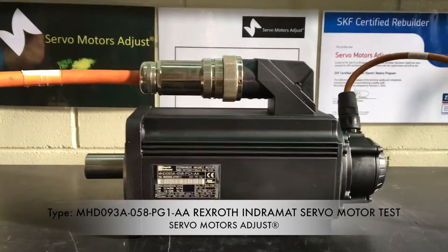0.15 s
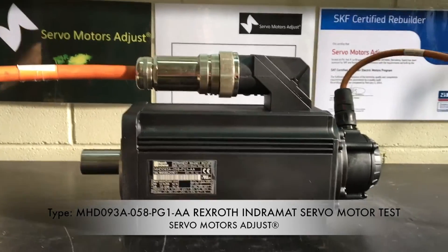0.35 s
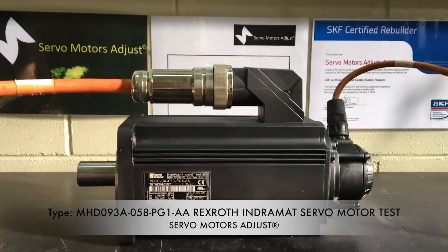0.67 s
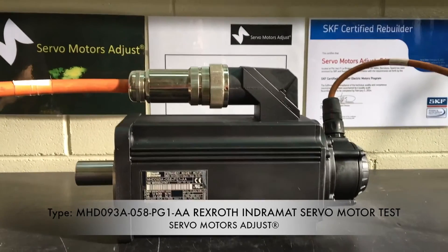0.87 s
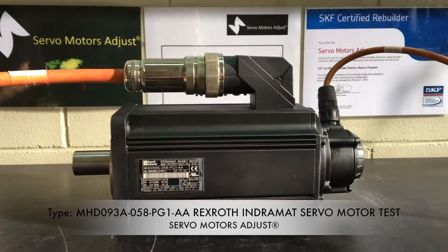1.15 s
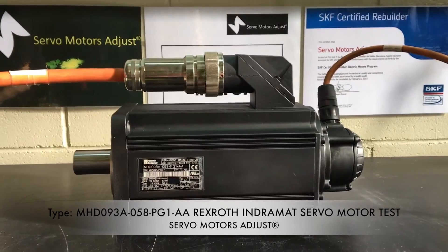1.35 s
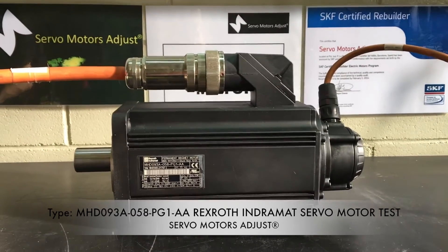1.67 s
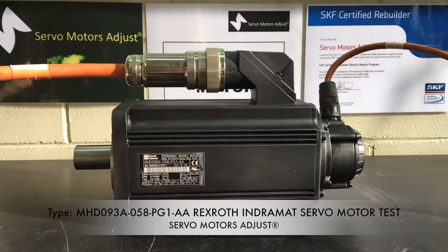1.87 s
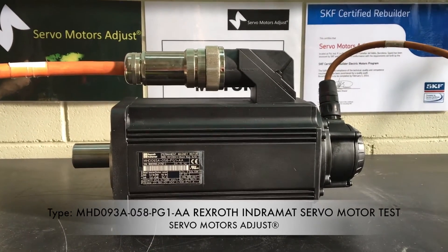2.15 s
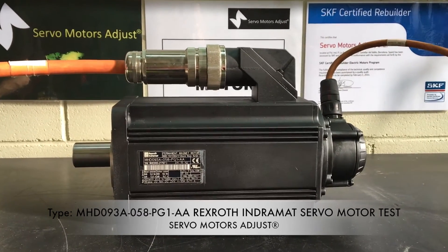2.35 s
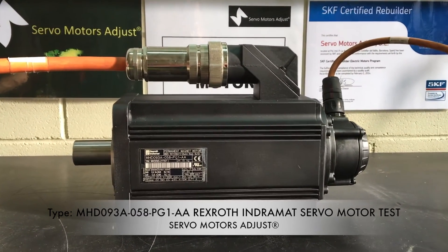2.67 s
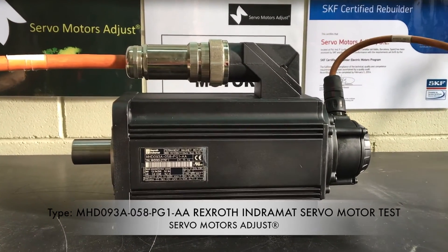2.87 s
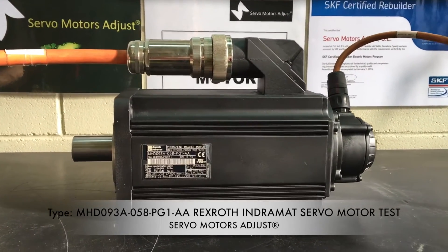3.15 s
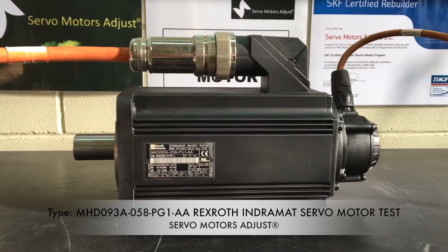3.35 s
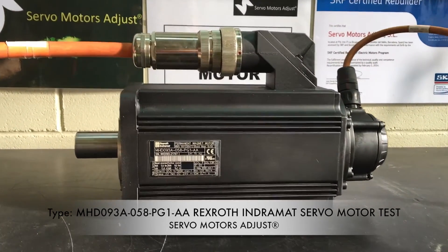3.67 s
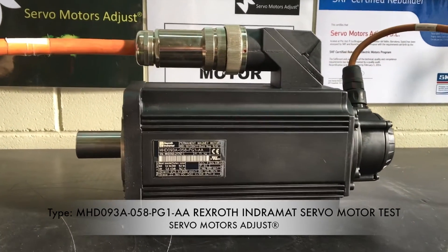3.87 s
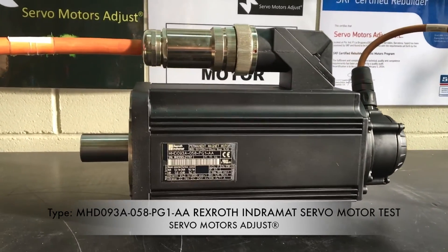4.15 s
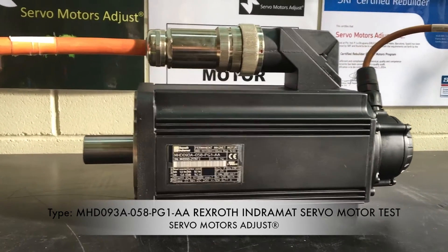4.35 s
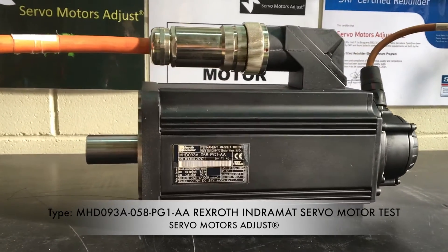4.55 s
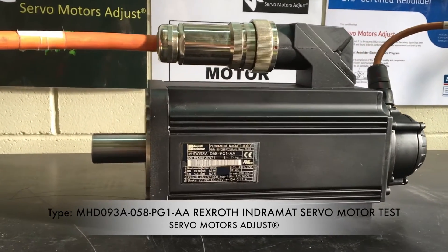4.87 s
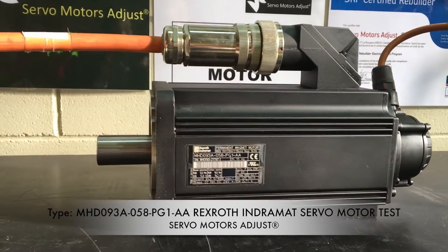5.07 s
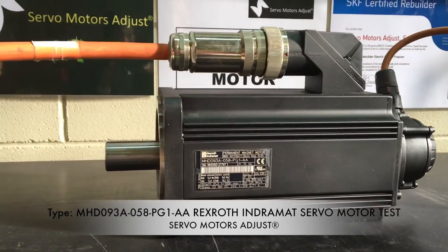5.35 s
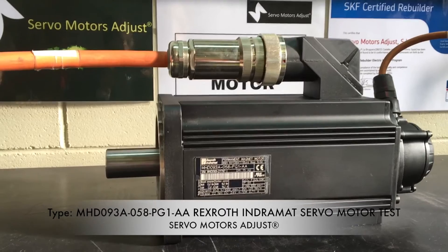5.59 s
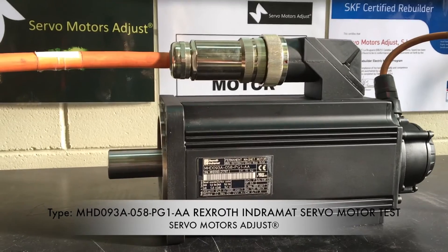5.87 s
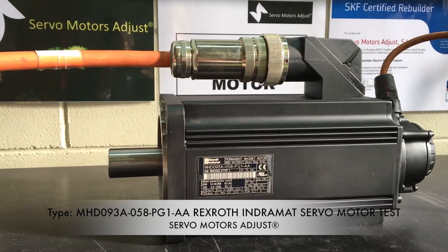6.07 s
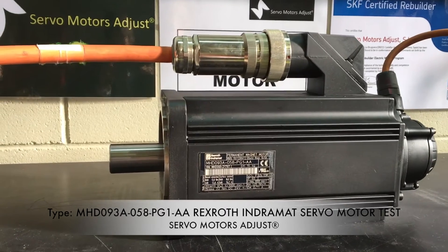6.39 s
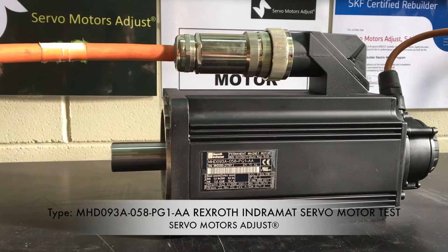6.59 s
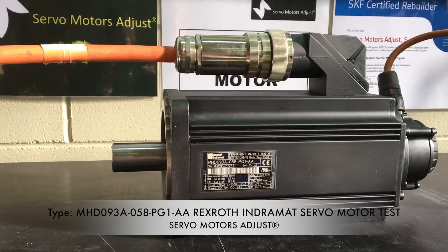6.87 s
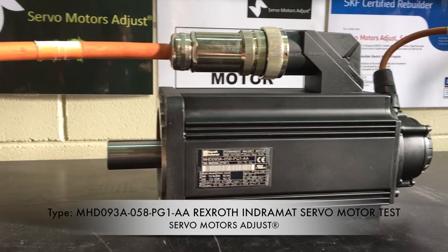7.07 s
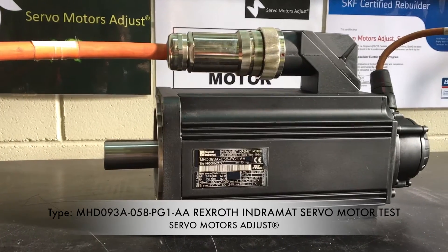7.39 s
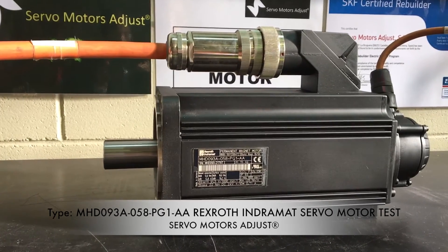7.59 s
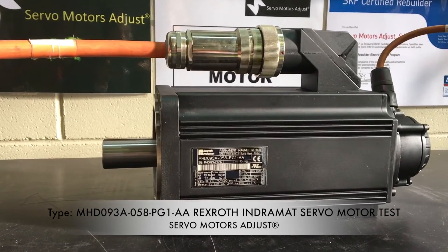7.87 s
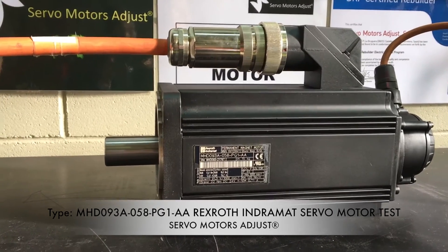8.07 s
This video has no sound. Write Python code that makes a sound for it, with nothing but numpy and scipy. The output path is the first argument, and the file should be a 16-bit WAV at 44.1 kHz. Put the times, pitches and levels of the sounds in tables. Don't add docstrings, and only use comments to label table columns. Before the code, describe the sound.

A servo motor sings a piercing, steady high whine over fan hiss and low hum, then its rotor tones sweep upward as it speeds up.

```python
import sys
import numpy as np
from scipy import signal
from scipy.fft import rfft, irfft, next_fast_len
from scipy.io import wavfile
from scipy.ndimage import uniform_filter1d, map_coordinates

SR = 44100
rng = np.random.default_rng(int(sys.argv[2]) if len(sys.argv) > 2 else 0)


def master_out(mix):
    frames = np.transpose(np.atleast_2d(mix))
    ceiling = np.clip(frames, -1, 1)
    pcm = np.round(ceiling * 32767).astype(np.int16)
    wavfile.write(sys.argv[1], SR, pcm)


def voltage_ratio(decibels):
    exponent = np.asarray(decibels, float) / 20
    return 10 ** exponent


N = 362943
T = np.arange(N) / SR

# t/s, firing rate f/Hz, level/dB
TRUCK_ENGINE = [(0, 42.04, -55), (.75, 36.4, -49), (1.49, 33.56, -49), (1.7, 31.85, -58.5),
                (2.11, 26.7, -63), (3.45, 35.87, -47), (3.8, 39.1, -54), (4.26, 43.9, -39.5),
                (4.42, 45.2, -49), (4.86, 51.2, -45), (5.43, 56.66, -41), (5.9, 59.8, -35),
                (6.29, 61.5, -48), (6.42, 64, -42.5), (6.88, 55.95, -43.5), (7.15, 58.1, -49.5),
                (7.47, 59.6, -41), (7.75, 60.5, -58)]
# t/s, f/Hz, level/dB
WALL_THUDS = [
    (2.35, 84.03, -49),
    (5.95, 79.74, -42),
    (6.2, 112, -51.5),
    (6.4, 134.7, -52),
    (6.62, 80, -42.5),
]
# t/s, level/dB
CONTACT_CLICK = (5.748, -49)

# t/s, position/1 (0 first spot, 1 second spot)
MICROPHONE_PATH = [
    (0, 0.15),
    (2, 0.17),
    (3.6, 0.35),
    (4.1, 0.55),
    (4.6, 0.97),
    (5.2, 0.98),
    (8.23, 0.97),
]

# t/s, second blade tone minus FAN_HZ f/Hz, load level/dB
FAN_HUNTING = [(0, 0, 0), (.4, -0.35, 1), (.8, .5, -1), (1.1, .8, 0.5), (1.35, .5, 0.5), (1.7, 1.57, 0),
               (2.05, 2, 1.5), (2.5, 0.56, -2), (2.8, 0.07, 1.5), (3.2, 1.44, -2), (3.6, 1.5, -0.5),
               (4.5, -1.1, 2), (5.2, -0.03, -1.5), (6.1, -.4, -1), (6.6, -1.15, 1), (7, -1.5, -0.5),
               (7.6, 0, -0.5), (8.23, -0.4, -.5)]
# shaft order/1, level/dB at first spot, level/dB at second spot
FAN_TONES = [(4.95, -60.5, -56), (7.85, -65.5, -66.5), (9.04, -62.5, -80.5), (14.99, -53, -56.5),
             (24.14, -62.5, -66.5), (29.1, -64, -59), (34.6, -65, -79), (39.8, -63.5, -61)]
# shaft order/1, level/dB at first spot, level/dB at second spot, swell depth/dB
UPPER_BLADE_TONES = [(20, -53, -60.5, 1.5), (25, -48, -68.5, 0.9), (30, -58.5, -49, 1)]
# f/Hz, density level/dB per Hz
HISS_FIRST = [(250, -36), (450, 0), (700, -1), (950, -1.5), (1300, 2), (2000, 2), (2800, -3), (3400, 2.5),
              (3800, -1.5), (4400, 0), (4700, -6.5), (6500, -7), (7500, -15), (9000, -36.5)]
# f/Hz, density level/dB per Hz
HISS_SECOND = [(250, -31.5), (450, -2.5), (700, -1.5), (950, 1.5), (1500, -0.5), (2400, 0.5), (3000, -3),
               (3500, -2.5), (3900, 0.5), (4450, -1.5), (4700, -7.5), (6500, -9.5), (7500, -14),
               (9000, -36)]
# f/Hz, density level/dB per Hz
AIR_TREBLE = [(6500, -30), (7500, -1), (8600, 1), (9600, -2), (10400, -7), (12500, -7), (14000, -9),
              (15900, -15)]
# f/Hz, density level/dB per Hz
DUCT_ROAR = [(15, -53), (30, -12), (60, -4), (110, -11.5), (160, -17), (205, -17), (248, 2), (285, -3.5),
             (340, -10), (420, -24.5), (600, -54.5)]
FAN_HZ = 802

# t/s, Doppler shift f/Hz, level/dB in the standing waves
WHINE_DRIFT = [(0, -.3, -30), (.6, -0.72, -28.5), (.9, -.3, -30), (2, .1, -30.4), (2.5, .3, -29.5),
               (3.05, .4, -31.5), (3.3, .6, -30), (3.7, .6, -31), (3.9, 1.2, -29), (4.3, 1.4, -35),
               (4.7, 1, -38.6), (4.9, 1, -37.5), (5.1, -0.17, -33), (5.7, -0.47, -33), (6.1, 0, -27.5),
               (6.65, -0.59, -25), (7.1, 0, -24.5), (8.23, 0.15, -25)]
# t/s, turns per second f/Hz
SHAFT_SPEED = [
    (0, 50 / 3),
    (5.82, 50 / 3),
    (6.87, 50),
    (8.3, 50),
]
# multiple of the whine/1, shaft order/1, level/dB slow, level/dB fast
INVERTER_LINES = [(1.5, -2, -79, -63.5), (1.5, 2, -81, -77), (1.5, 6, -75, -61), (1.5, -6, -82, -79),
                  (1.5, 10, -80, -73), (1.5, -10, -86, -74), (1.5, 14, -90, -75), (1.5, -14, -88, -78),
                  (1.5, 18, -90, -83), (2, -8, -88, -73), (2, -12, -90, -70), (2, -16, -95, -86),
                  (2, -20, -95, -74), (1, 8, -70, -76), (1, 16, -76, -72), (1, -16, -75, -73),
                  (.5, 2, -68, -64), (.5, 6, -70, -67)]
# shaft order/1, level/dB slow, level/dB fast
ROTOR_TONES = [(1, -85, -62), (2, -75, -55), (4, -70, -57), (17, -68, -58), (17.5, -59, -47),
               (18, -66, -54), (18.5, -72, -61)]
# f/Hz, level/dB
BENCH_RESPONSE = [(250, -3), (370, -4), (430, 2), (510, -9), (600, -1), (720, 0), (810, -4), (870, 0)]
WHINE_HZ = 8000
# level/dB slow at first spot, slow at second spot, fast
LOWER_DB, UPPER_DB = (-48.5, -63, -51.5), (-55, -55, -47)
NODE_SPOT, NODE_DB = .62, -68

# f/Hz, level/dB relative to the whine line
WHINE_THRESHOLD = [(5500, -85), (6000, -66), (6400, -56.5), (7000, -52.5), (7600, -49), (7680, -90), (8250, -90),
                   (8300, -38), (9000, -43.5), (9600, -47), (10600, -51.5), (11300, -59.5), (12900, -59.5),
                   (14600, -56), (14950, -72)]
# f/Hz, level/dB per bin
TOP_FLOOR = [(13800, -110), (14300, -93), (14700, -87), (15400, -87), (15750, -90), (15800, -40)]
# start t/s, end t/s, rise level/dB
THRESHOLD_RISES = [(.58, 1.43, 14), (1.79, 1.92, 13), (1.99, 2.01, 8), (2.36, 2.4, 12), (3.76, 3.79, 5),
                   (3.87, 3.9, 5), (4.08, 4.2, 3), (4.2, 4.27, 9), (6.69, 7, 12), (7.4, 7.68, 12),
                   (7.9, 8.08, 12)]
# f/Hz, density level/dB per Hz
WHINE_SKIRT = [(7650, -32.5), (7700, -19), (7880, -11.5), (7950, 4), (8050, 4), (8120, -8.5), (8280, -20),
               (8300, -33)]


def unit(x):
    return x / np.sqrt(np.mean(x ** 2) + 1e-20)


def gain_db(gain):
    return 20 * np.log10(np.abs(gain) + 1e-6)


def curves(rows):
    s, *cols = np.transpose(rows)
    return [np.interp(T, s, c) for c in cols]


def wobble(rate):
    return map_coordinates(rng.standard_normal(int(N * rate / SR) + 4), [T * rate])


def tone(turns, db, locked=False):
    start = 0 if locked else rng.random()
    return np.sqrt(2) * voltage_ratio(db) * np.sin(2 * np.pi * (turns + start))


def rush(spectrum, patchy_db):
    _, _, z = signal.stft(rng.standard_normal(N + SR), SR, nperseg=512)
    patches = uniform_filter1d(rng.standard_normal(z.shape), 5, 0)
    patches = unit(uniform_filter1d(patches, 10, 1))
    x = signal.istft(z * voltage_ratio(patchy_db * patches), SR, nperseg=512)[1][:N]
    f, db = np.transpose(spectrum)
    m = next_fast_len(N)
    log_hz = np.log(np.fft.rfftfreq(m, 1 / SR) + 1)
    colour_db = np.interp(log_hz, np.log(f + 1), db, left=-120, right=-120)
    return unit(irfft(rfft(x, m) * voltage_ratio(colour_db), m)[:N])


def walls(x, echo_db):
    delays = (SR * rng.uniform(.002, .03, size=9)).astype(int)
    echoes = sum(voltage_ratio(echo_db) * rng.choice([-1, 1]) * np.roll(x, d) for d in delays)
    return unit(x + echoes)


def microphone_spot():
    return np.clip(curves(MICROPHONE_PATH)[0], 0, 1)


def truck_and_thuds():
    hz, db = curves(TRUCK_ENGINE)
    second_db = -53 - 0.3231 * (hz - 30) + 1.7 * wobble(4)
    firing = np.cumsum(hz) / SR
    out = tone(firing, db + 2.4 * wobble(7.2))
    out += tone(2 * firing, second_db + 0.5 + 1.5 * wobble(7.3))
    for s, pitch_hz, peak_db in WALL_THUDS:
        out += tone(pitch_hz * T, peak_db) * np.exp(-((T - s) / 0.086) ** 2)
    return out


def cabinet_fan():
    spot = microphone_spot()
    drift, load_db = curves(FAN_HUNTING)
    shaft = np.cumsum((FAN_HZ + drift) / 10 + 0.071 * wobble(25)) / SR
    out = tone(10 * shaft, -43 + .7 * load_db + 1.7 * wobble(15))
    for order, first_db, other_db, swell_db in UPPER_BLADE_TONES:
        db = first_db + spot ** 2.2 * (other_db - first_db) + 1.5 * load_db + swell_db * wobble(4.4)
        blurred = round(order) * shaft + .045 * wobble(45)
        out += tone(blurred, db + .4 + 1.2 * wobble(12) + 1.8 * wobble(30))
    for order, first_db, other_db in FAN_TONES:
        db = first_db + spot * (other_db - first_db) + 1.3 * wobble(6) + 2.86 * wobble(28)
        out += tone(order * shaft + 0.073 * wobble(45), db)

    ducked_db = 0.22 * np.maximum(curves(WHINE_DRIFT)[1] + 30, 0)
    duct_db = -42 + 0.8 * wobble(4) - ducked_db
    hiss_db = -44.5 - ducked_db
    first = walls(rush(HISS_FIRST, patchy_db=.8), echo_db=-16)
    other = walls(rush(HISS_SECOND, patchy_db=.8), echo_db=-16)
    hiss = np.sqrt(1 - spot) * first + np.sqrt(spot) * other
    out += voltage_ratio(hiss_db + 3.5) * hiss
    out += voltage_ratio(duct_db + 0.6) * rush(DUCT_ROAR, patchy_db=0.56)
    return out + voltage_ratio(-58) * rush(AIR_TREBLE, patchy_db=1.5)


def contact_click():
    start, db = CONTACT_CLICK
    age = np.maximum(T - start, 0)
    decay_db = 60 * np.minimum(age / 0.023, 4)
    return np.diff(rng.standard_normal(N + 1)) * voltage_ratio(db - decay_db) * (T >= start)


def servo_motor():
    speed, = curves(SHAFT_SPEED)
    shaft = np.cumsum(speed) / SR
    fast = (speed - speed[0]) / (speed[-1] - speed[0])
    shift, db = curves(WHINE_DRIFT)
    whine = np.cumsum(WHINE_HZ + shift) / SR
    spot = microphone_spot()

    first, other, quick = voltage_ratio(LOWER_DB)
    slow = first + spot ** 1.5 * (other - first)
    lower_db = gain_db(np.abs((1 - fast) * slow - fast * quick) + voltage_ratio(-77))
    first, other, quick = voltage_ratio(UPPER_DB)
    before_node = first * (1 - spot / NODE_SPOT)
    after_node = other * (spot - NODE_SPOT) / (1 - NODE_SPOT)
    slow = np.maximum(before_node, after_node) + voltage_ratio(NODE_DB)
    upper_db = gain_db(slow + fast * (quick - slow))

    flutter_db = 0.32 * wobble(3.9) + 0.32 * wobble(10) + 0.33 * wobble(60)
    flutter_db += 0.27 * np.sin(2 * np.pi * shaft) + 0.24 * np.sin(np.pi * shaft)
    out = tone(whine + 0.0031 * wobble(70), db + flutter_db, locked=True)
    out += tone(whine - 4 * shaft, lower_db + 0.99 * wobble(6.3), locked=True)
    out += tone(whine + 4 * shaft + .1 + .24 * fast, upper_db + 1.2 * wobble(7), locked=True)

    for multiple, order, slow_db, fast_db in INVERTER_LINES:
        line_db = slow_db + np.sqrt(fast) * (fast_db - slow_db) + 1.2 * wobble(4)
        out += tone(multiple * whine + order * shaft, line_db)
    for order, slow_db, fast_db in ROTOR_TONES:
        rotor_db = slow_db + fast * (fast_db - slow_db)
        rotor_db += (1 + 8 * fast * (1 - fast)) * wobble(12)
        if order > 10:
            rotor_db += np.interp(order * speed, *np.transpose(BENCH_RESPONSE))
        out += tone(order * shaft, rotor_db)
    return out


def scene():
    return (truck_and_thuds() + cabinet_fan() + contact_click() + servo_motor())[None]


def threshold_rise(s):
    return sum(db * ((s > start) & (s < end)) for start, end, db in THRESHOLD_RISES)


def gated(x):
    hz, s, z = signal.stft(x, SR, nperseg=2048, noverlap=1536)
    power = np.abs(z) ** 2
    whine_db = 10 * np.log10(power[(hz > 7900) & (hz < 8100)].max(0))
    patches = rng.standard_normal((65, len(s) // 2 + 1))
    patches = np.repeat(np.repeat(patches, 16, 0), 2, 1)[:len(hz), :len(s)]
    runs = np.repeat(rng.standard_normal(len(s) // 4 + 1), 4)[:len(s)]
    mask_db = np.interp(hz, *np.transpose(WHINE_THRESHOLD))[:, None] + whine_db + threshold_rise(s)
    quiet_db = np.interp(hz, *np.transpose(TOP_FLOOR), left=-200)[:, None]
    limit = voltage_ratio(np.maximum(mask_db, quiet_db) + patches + 1.6 * runs) ** 2
    band = uniform_filter1d(uniform_filter1d(power, 11, 0), 3, 1)
    line = uniform_filter1d(power, 3, 0)
    keep = (band > limit) | (line > 4 * limit)
    keep &= power > .25 * limit
    return signal.istft(z * keep, SR, nperseg=2048, noverlap=1536)[1][:N]


def band_limit(x):
    return signal.sosfilt(signal.butter(12, 15940, fs=SR, output="sos"), x)


def record(dry):
    whine_db = curves(WHINE_DRIFT)[1]
    rise_db = uniform_filter1d(threshold_rise(T) * 1., 2000)
    skirt = voltage_ratio(whine_db - 27.5 + .5 * rise_db) * rush(WHINE_SKIRT, patchy_db=3.5)
    mix = gated(dry[0] + skirt)[None]
    return band_limit(mix)


dry = scene()
out = record(dry)
master_out(out)
```